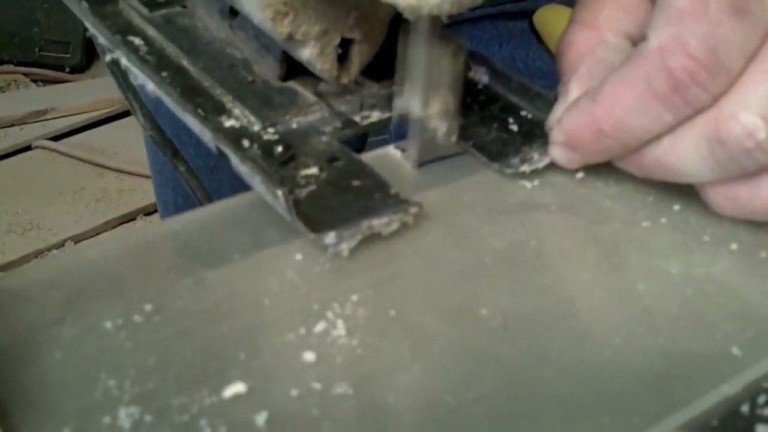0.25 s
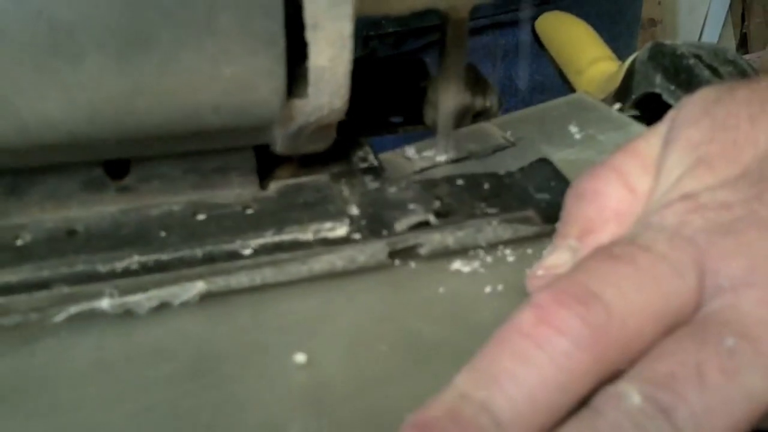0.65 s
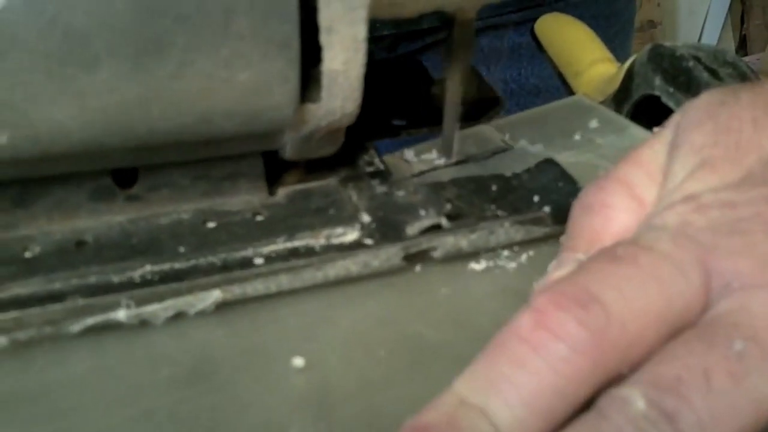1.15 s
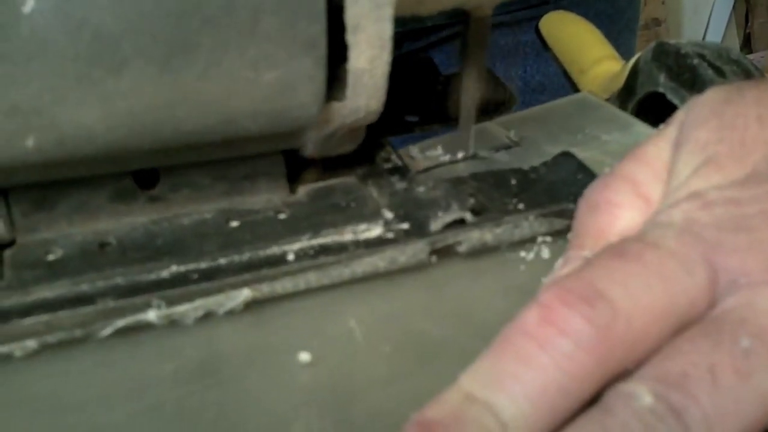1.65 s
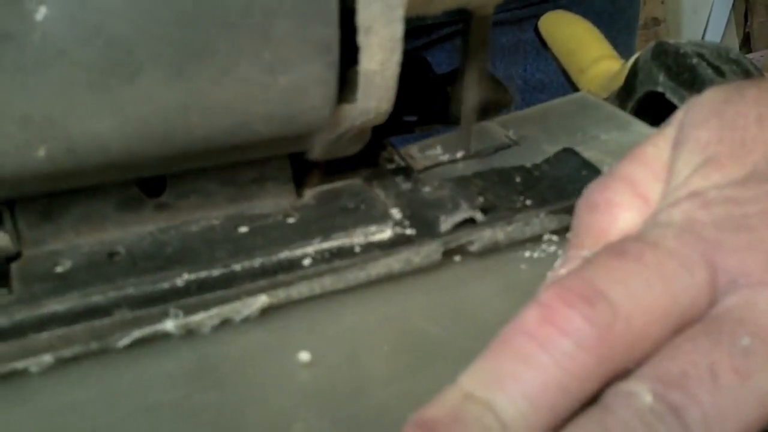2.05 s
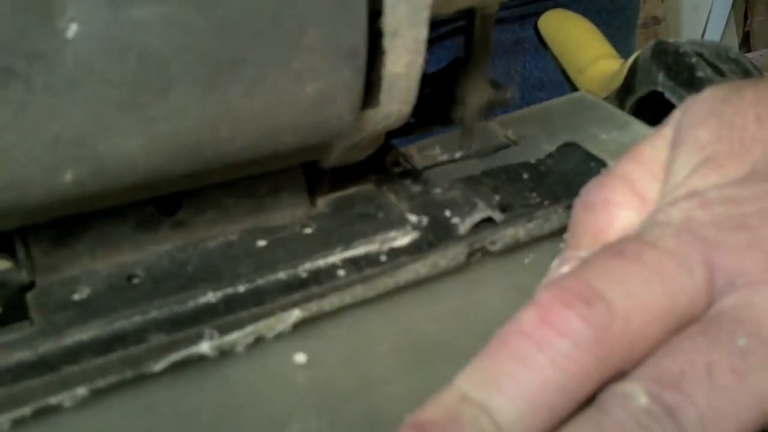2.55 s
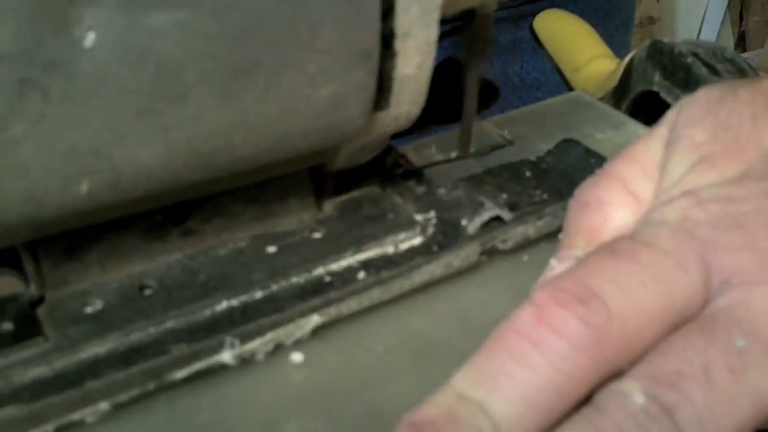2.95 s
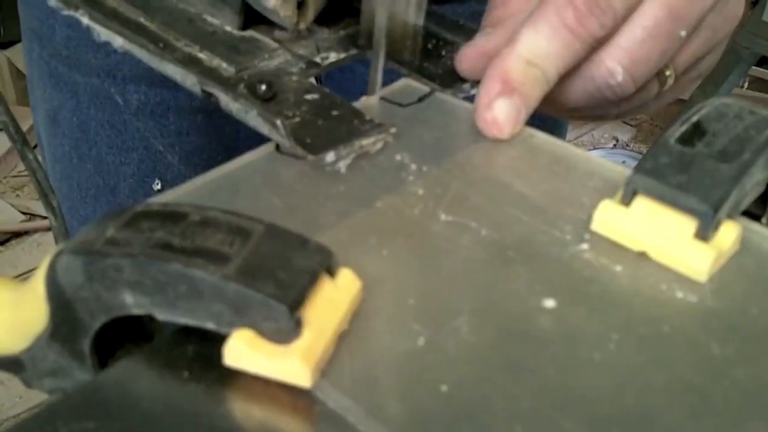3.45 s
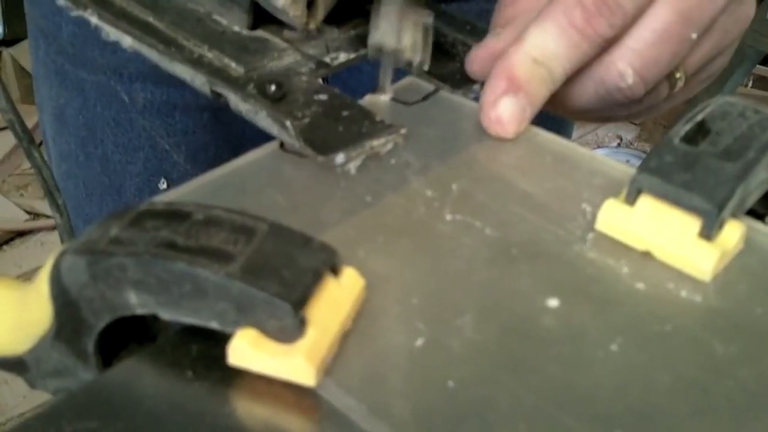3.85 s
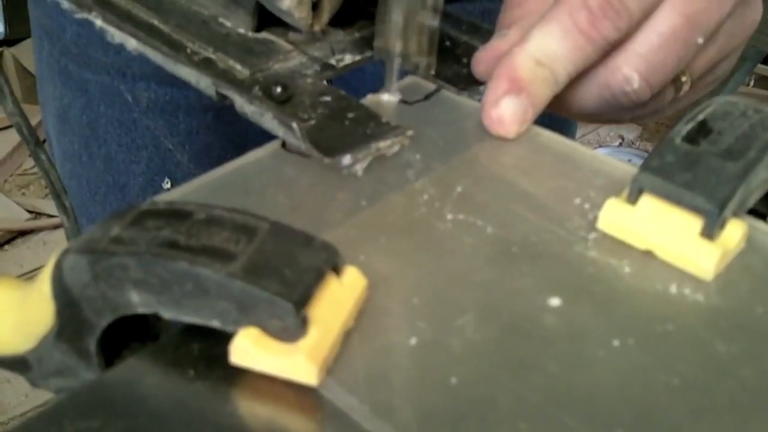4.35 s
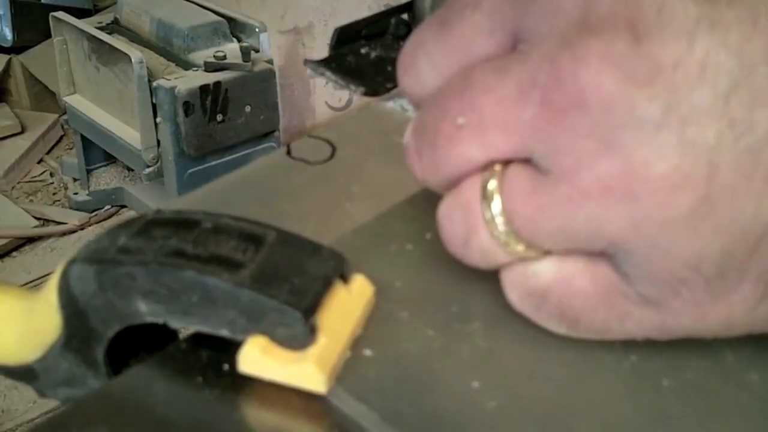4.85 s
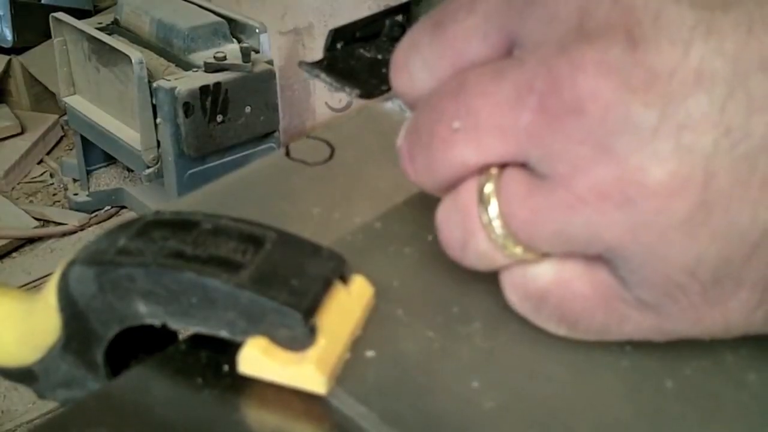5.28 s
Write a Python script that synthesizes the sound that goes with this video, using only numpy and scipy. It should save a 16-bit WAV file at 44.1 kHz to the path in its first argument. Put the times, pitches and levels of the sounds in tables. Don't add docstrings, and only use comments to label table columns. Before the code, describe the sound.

Close, harsh rattling of an electric jigsaw cutting plastic, changing speed from take to take, with gear whine, snags and one dull bump.

```python
import sys
import numpy as np
from scipy import signal
from scipy.fft import irfft
from scipy.io import wavfile
from scipy.ndimage import uniform_filter1d

SR = 44100
rng = np.random.default_rng(int(sys.argv[2]) if len(sys.argv) > 2 else 0)


def makeup_ratio(level_db):
    decades = np.asarray(level_db, float) / 20
    return 10 ** decades


def generate_wav(signal):
    frames = np.transpose(np.atleast_2d(signal))
    scaled = np.clip(frames, -1, 1) * 32767
    pcm = np.round(scaled).astype(np.int16)
    wavfile.write(sys.argv[1], SR, pcm)


N = 243431

# start_s, end_s, fade_in_s, fade_out_s
TAKES = [
    (0, .499, .0001, 0.093),
    (.499, 3.368, 0.1, .075),
    (3.368, 4.736, 0.17, 0.086),
    (4.736, 5.6, 0.12, .01),
]
BITES = [(.3, .05, .75, .05, .2, .3), (.98, .035, .66, .06, .57, .8), (.4, .04, .05, .08, .4, .3),
         (.96, .06, .33, .05, .0, .3)]
GEAR = 70.0


def evened(x):
    return x / np.sqrt(np.mean(x ** 2) + 1e-20)


def read(points, hz):
    f, value = np.transpose(points)
    return np.interp(np.log(hz + 1), np.log(f + 1), value)


def colour(x, db_of):
    log_gain = np.log(makeup_ratio(db_of(abs(np.fft.fftfreq(8192, 1 / SR)))))
    response = np.exp(np.conj(signal.hilbert(log_gain)))[:4097]
    return signal.oaconvolve(x, irfft(response)[:4096])[:len(x)]


def wander(size, hz):
    span = max(int(SR / hz), 2)
    return evened(uniform_filter1d(uniform_filter1d(rng.standard_normal(size), span), span))


def crest(turns, at, width):
    return np.exp((np.cos(2 * np.pi * (turns - at)) - 1) / (2 * np.pi * width) ** 2)


def chips(size, per_s, spread_db):
    clicks = (rng.random(size) < per_s / SR) * rng.standard_normal(size)
    clicks = clicks * makeup_ratio(spread_db * np.minimum(rng.exponential(1, size), 4))
    return evened(evened(clicks) + 1.14 * rng.standard_normal(size))


def blade_motion(k, t):
    # time_s, blade_strokes_per_s
    stroke_rates = [
        [(0, 37.3), (.27, 29), (.49, 26)],
        [(.51, 29.515), (.71, 28.193), (1.14, 32.147), (1.54, 28.456), (1.88, 32.444), (2.23, 34.222),
         (2.6, 33.123), (3.23, 33.77), (3.36, 33.443)],
        [(3.39, 38.276), (3.55, 36.761), (3.93, 34.897), (4.54, 36.099), (4.73, 35.002)],
        [(4.75, 27.182), (5.14, 27.149), (5.52, 26.033)],
    ]
    s, rate = np.transpose(stroke_rates[k])
    inertia_s = 0.155
    rate = uniform_filter1d(np.interp(t, s, rate), size=round(inertia_s * SR), mode="nearest")
    turns = np.cumsum(rate) / SR
    return rate, turns - np.interp(s[0], t, turns)


def hand_feed(t):
    # time_s, rasp_db, chatter_db
    feed_curve = [(0, -25, 0), (.32, -24.5, -3), (.45, -24, 3), (.6, -27.5, 6.5), (.83, -26, -1),
                  (1.05, -26.5, 4.5), (1.2, -24.5, 3.5), (1.68, -26.5, -1), (1.98, -25.5, 4.5),
                  (2.6, -25, 0), (3.45, -25.5, 1.5), (3.72, -29.5, -1.5), (4.08, -27, 1), (4.6, -25.8, -1),
                  (4.82, -31.5, -0.5), (5.06, -32.5, 1), (5.2, -25.5, -0.5), (5.52, -30, -2)]
    s, rasp_db, chatter_db = np.transpose(feed_curve)
    return np.interp(t, s, rasp_db), np.interp(t, s, chatter_db)


def cutting(k, t, turns, rasp_db, chatter_db, caught):
    # mode_hz, width_hz, lift_db
    ring_modes = [
        [(1430, 190, 7), (2230, 180, -1.5), (3430, 240, 6), (4600, 1700, 4.5), (6530, 560, 5.5)],
        [(200, 53, -3.5), (1005, 26, 7.5), (1202, 21, 6), (1462, 52, 9), (2044, 86, 10.5), (2210, 120, 4.5),
         (3264, 160, 6), (4140, 370, 6), (4630, 220, 5), (6160, 780, 3.5), (7080, 134, 14.5)],
        [(200, 130, -2.5), (489, 69, 6), (676, 104, 8.5), (1520, 510, 6.5), (3330, 220, 6.5), (3870, 220, 4),
         (4550, 900, 4.5), (6530, 910, 4.5)],
        [(475, 61, 12), (730, 24, 11), (1253, 174, 12.5), (2390, 430, 9), (3470, 290, 5), (4600, 170, 5),
         (6550, 210, 6)],
    ]
    # freq_hz, level_db
    rasp_colour = [(30, -34), (100, -13), (250, -17), (600, -8.5), (1200, -8.5), (2000, -6), (3000, 1),
                   (5000, 1), (8000, 0), (15000, 2.5)]
    # freq_hz, level_db
    bite_colour = [(100, -17), (300, -13.5), (800, -16.5), (1300, -12.5), (2200, -5), (3500, -2),
                   (5000, -1), (8000, 0), (15000, 0.5)]
    # low_lift_db, fizz_lift_db, fizz_drift_db_per_s, first_bite_db, second_bite_db
    camera_views = [(0, 2, -4.5, -5, -1), (1.88, 0.5, -0.9, -1, 0.5), (0.84, 6, -4, -0.5, 5.5),
                    (-0.5, 1.5, -2, 10.5, 9)]
    low_db, fizz_db, drift_db, first_db, second_db = camera_views[k]
    first, first_width, second, second_width, _, _ = BITES[k]
    size = len(t)

    def rings(hz):
        lift = sum((makeup_ratio(db) - 1) / (1 + (2 * (hz - f) / w) ** 2) for f, w, db in ring_modes[k])
        return 20 * np.log10(1 + lift)

    rasp = chips(size, 4000, 2.5) * makeup_ratio(rasp_db + 1.2 * wander(size, 250) - 2.1)
    luck = makeup_ratio(1.3 * wander(size, 80))
    bite = makeup_ratio(first_db + chatter_db) * crest(turns, first, first_width)
    bite = bite + makeup_ratio(second_db + chatter_db) * crest(turns, second, second_width)
    bites = chips(size, 4000, 1.8) * bite * luck * makeup_ratio(rasp_db - 2.5) + caught
    cut = colour(rasp, lambda hz: read(rasp_colour, hz) + rings(hz) + 6.44)
    cut = cut + colour(bites, lambda hz: read(bite_colour, hz) + rings(hz) + 6.56)

    low = signal.sosfiltfilt(signal.butter(4, 2700, fs=SR, output="sos"), cut)
    fizz = signal.sosfiltfilt(signal.butter(6, 5500, "high", fs=SR, output="sos"), cut)
    low_db = low_db - 0.15 * (rasp_db - rasp_db.mean())
    fizz_db = fizz_db + drift_db * (t - t[0])
    return cut + (makeup_ratio(low_db) - 1) * low + (makeup_ratio(fizz_db) - 1) * fizz


def snags():
    # time_s, peak_db, ring_ms
    single_snags = [(0.061, -7.5, 1.6), (0.1496, -7.5, 1.5), (0.3017, -9, 2), (0.7008, -5.5, 1.1),
                    (1.3934, 0.5, 1.6), (1.4244, -6.5, 1.4), (1.4925, -5.5, 1.1), (1.7956, -3.5, 1.5),
                    (1.8078, -5.5, 1.1), (2.3302, -14, 2.2), (2.4168, -11, 1.5), (3.4141, -4, 1.6),
                    (3.6030, -6.5, 2.3), (3.693, -8, 1.5), (4.0056, -5, 1.2), (4.1107, -3, 0.58),
                    (4.587, -13, 1.4), (4.6246, -5, 1.26), (4.759, -3, 1.4), (4.8343, -5, 1.3),
                    (4.9265, -4, 3.1), (5.11, -6.5, 2.4), (5.202, -10, 0.84), (5.3745, -3, 1.44)]
    # first_s, last_s, rough_gap_s, first_db, last_db
    snag_runs = [(0.362, .38, .018, -8, -10), (0.595, .63, .018, -7, -10), (.7844, .8194, .035, -10, -9.5),
                 (1.647, 1.6786, .034, -13, -9), (3.7218, 3.832, .028, -4, -3.5),
                 (3.861, 3.9205, .029, -6.5, -28), (4.28, 4.336, .028, -9, -14),
                 (4.7444, 4.8217, .037, 3, -6), (4.9677, 5.0772, .037, -7.5, -14),
                 (5.1474, 5.3374, .037, -13, -8.5), (5.161, 5.3144, .038, -8.5, -13),
                 (5.4124, 5.4899, .037, -4, -6)]
    snag_shapes = [(1.54, 2), (1.54, 2), (.7, .7), (2.6, 3.5)]
    ring_share, luck_db = 0.051, 0.84
    rows = list(single_snags)
    for first, last, gap, first_db, last_db in snag_runs:
        for share in np.linspace(0, 1, num=round((last - first) / gap) + 1):
            db = first_db + share * (last_db - first_db) + luck_db * rng.standard_normal()
            rows.append((first + share * (last - first), db, 1000 * ring_share * gap))

    lead = 300
    out = np.zeros(N + 1500)
    t = np.arange(-lead, 900)
    for s, db, ms in rows:
        rise, roundness = snag_shapes[sum(s > end for _, end, *_ in TAKES)]
        grain = rng.standard_normal(len(t))
        grain = grain / np.sqrt(uniform_filter1d(grain ** 2, size=30))
        u = np.maximum(1 + (1000 * t / SR / ms - 1.4) / rise, 0)
        swell = (u * np.exp(1 - u)) ** roundness
        out[round(s * SR):][:len(t)] += makeup_ratio(db - 11.9) * grain * swell
    return out[lead:N + lead]


def knock(turns, at, hz, t60):
    size = len(turns)
    slap = np.diff(np.floor(turns - at), prepend=np.floor(turns[0] - at))
    slap = slap * makeup_ratio(1.8 * wander(size, 40))
    rattle = signal.oaconvolve(slap, np.hanning(120))[:size] * rng.standard_normal(size)
    slap = slap + 0.07 * rattle
    spin = np.exp(2j * np.pi * np.cumsum(hz * (1 + 0.025 * wander(size, 30))) / SR)
    decay = 1000 ** (-1 / (t60 * SR))
    ring = (spin * signal.lfilter([1], [1, -decay], slap / spin)).imag
    return evened(np.diff(uniform_filter1d(ring, size=9), prepend=0))


def slaps(k, t, turns):
    # first_slap_db, first_hz_at_start, first_hz_settled, second_slap_db
    slap_levels = [(-47.5, 1380, 2000, -45.5), (-46, 1250, 958, -49.5), (-49, 1500, 1400, -53),
                   (-47, 1250, 1230, -43.5)]
    # second_slap_hz, first_t60_s, second_t60_s
    slap_rings = [(2260, 0.039, 0.016), (1492, 0.023, 0.033), (1817, 0.03, 0.048), (2340, 0.034, 0.012)]
    # middle_s, half_length_s, first_lift_db, second_lift_db
    flap_spells = [(.8, .17, 8, 0.5), (0.932, 0.12, -0.5, 16), (1.18, 0.14, 4, 8.5),
                   (1.524, 0.32, 7.5, 10.5), (1.89, 0.053, 2.5, -1), (2.952, 0.04, 5.5, 1),
                   (3.443, 0.083, 10.5, 11), (3.79, .07, 0, 11), (4.34, .07, -3, -3), (4.66, .1, -14, 4),
                   (4.84, 0.086, -2, 8), (4.98, .1, 1.5, -3), (5.27, 0.1, 6, 14)]
    first_db, loose_hz, settled_hz, second_db = slap_levels[k]
    second_hz, first_t60, second_t60 = slap_rings[k]
    first, second = BITES[k][0], BITES[k][2]
    looseness = np.clip(1 - ((t - t[0]) / 1.04) ** 2, 0, 1)
    first_hz = settled_hz + (loose_hz - settled_hz) * looseness
    for middle, half, first_lift_db, second_lift_db in flap_spells:
        spell = np.exp(-((t - middle) / half) ** 2)
        first_db = first_db + first_lift_db * spell
        second_db = second_db + second_lift_db * spell

    tick_lead = 0.06
    body = knock(turns, first - 0.6 * tick_lead, first_hz, first_t60)
    tick = knock(turns, first - tick_lead, 0.89 * first_hz, 0.003)
    return makeup_ratio(first_db) * (body + tick) + makeup_ratio(second_db) * knock(turns, second, second_hz, second_t60)


def gear_whine(k, t, rate, turns):
    # level_db, drift_db_per_s, mode_hz, width_hz, lift_db
    whine_modes = [(-47.5, -2, 2230, 260, 17.5), (-35.5, -0.6, 2046, 370, 8), (-45, 6.5, 2610, 91, 11),
                   (-51, 4, 1900, 200, 5)]
    base_db, creep_db, mode_hz, width_hz, lift_db = whine_modes[k]
    size = len(t)
    whine_db = base_db + creep_db * (t - t[0])
    whine_db = whine_db + lift_db / (1 + (2 * (GEAR * rate - mode_hz) / width_hz) ** 2)
    gear_at, throb = BITES[k][4:]
    load = crest(turns, gear_at, 0.12) + 0.6 * crest(turns, gear_at + 0.43, 0.06)
    mesh = 1 - throb + throb * 1.8 * load
    lag = 0.5 * np.sin(4 * np.pi * turns + 1.27) + 0.32 * wander(size, 104)
    return np.sin(2 * np.pi * GEAR * turns + lag) * mesh * makeup_ratio(whine_db + 1.5 + 0.4 * wander(size, 87))


def bench_shake(k, t, turns, rasp_db):
    shake_orders = [1, 2, 3, 4, 5, 6, 7, 7.78, 9, 12, 14, 16, 19]
    order_levels = [
        [-80, -54, -52, -72, -59, -70, -74, -59, -73, -69, -56, -66, -56],
        [-60, -62, -47, -53, -55, -66, -58, -53, -56, -60, -67, -58.5, -65],
        [-47, -53.5, -55, -60, -70, -83, -75, -60, -59.5, -55.5, -47, -53.5, -55],
        [-63, -60, -55, -63, -55.5, -60, -67, -76, -70, -58, -65, -54, -50.5],
    ]
    bench_hum = (30, -47)
    mode_swell = (0.21, 0.075, 14)
    shake = {}
    for m, db in zip(shake_orders, order_levels[k]):
        drift = makeup_ratio(db + 2 + 1.5 * wander(len(t), 5.3))
        shake[m] = drift * np.sin(2 * np.pi * (m * turns + rng.random()))
    if k == 0:
        middle, spread, lift_db = mode_swell
        shake[3] = shake[3] * makeup_ratio(lift_db * np.exp(-((t - middle) / spread) ** 2))
        hum_hz, hum_db = bench_hum
        shake[1] = makeup_ratio(hum_db + 3) * np.sin(2 * np.pi * hum_hz * t)
    return makeup_ratio(0.8 * (rasp_db - rasp_db.mean())) * sum(shake.values())


def take(k, caught):
    start, end, rise, fall = TAKES[k]
    t = np.arange(round(start * SR), min(round(end * SR), N)) / SR
    rate, turns = blade_motion(k, t)
    rasp_db, chatter_db = hand_feed(t)
    caught = caught[round(start * SR):][:len(t)]
    saw = cutting(k, t, turns, rasp_db, chatter_db, caught)
    saw = saw + slaps(k, t, turns)
    saw = saw + gear_whine(k, t, rate, turns)
    saw = saw + bench_shake(k, t, turns, rasp_db)
    fade = np.clip((t - start) / rise, 0, 1) * np.clip((end - t) / fall, 0, 1)
    return saw * fade ** 1.055


def bump():
    # time_s, level_db, rise_s, fall_s
    camera_push = (1.3938, -6.5, .0016, .0105)
    # freq_hz, level_db, t60_s
    shell_ring = (680, -22, 0.022)
    s, db, rise, fall = camera_push
    hz, ring_db, t60 = shell_ring
    t = np.maximum(np.arange(N) / SR - s, 0)
    shell = makeup_ratio(ring_db - 60 * t / t60) * np.sin(2 * np.pi * hz * t)
    sag = 1.32 * np.exp(-t / fall) - 0.47 * np.exp(-t / 0.028)
    return shell + makeup_ratio(db) * (1 - np.exp(-t / rise)) * sag


def scene():
    caught = snags()
    saw = np.concatenate([take(k, caught) for k in range(len(TAKES))]) + bump()
    return np.array([saw, saw])


def low_pass(x):
    return signal.sosfilt(signal.butter(12, 15680, fs=SR, output="sos"), x)


def record(dry):
    # freq_hz, level_db
    band_shelves = [(20, 1.5), (4950, 0.5), (5100, -10), (5750, -10), (7200, -17.5), (7500, -14),
                    (8300, -22), (9000, -22), (10300, -22.5), (11300, -25), (13600, -29), (14500, -34.5),
                    (15300, -47), (15900, -77)]
    # freq_hz, width_hz, depth_db
    band_gaps = [(2709, 136, 24.3), (5500, 126, 25.4), (7827, 220, 49), (10840, 154, 33)]
    # freq_hz, level_db
    side_levels = [(100, -75), (1000, -39.5), (1400, -42), (2000, -22), (2800, -15.5), (3500, -12.5),
                   (5000, -9), (6500, -6.5), (9000, -2.5), (12000, -0.5), (15000, 5)]
    ceiling, mute_db = 0.85, -53

    def bands(hz):
        gaps = sum(db * np.exp(-abs((hz - f) / w) ** 0.92) for f, w, db in band_gaps)
        return read(band_shelves, hz) - gaps

    limited = ceiling * np.tanh(colour(dry[0], bands) / ceiling)
    hz, _, z = signal.stft(limited, SR, nperseg=512)
    power = abs(z) ** 2
    total = power.sum(0)
    running = np.minimum(uniform_filter1d(total, size=60), 3 * total)
    threshold = running * makeup_ratio(mute_db + 2 * rng.standard_normal(z.shape[1])) ** 2
    heard = uniform_filter1d(power, size=4, axis=0) > threshold
    z = z * np.where(heard | (hz < 5000)[:, None], 1, 0.03)

    scatter = np.exp(2j * np.pi * rng.random(z.shape))
    side = z * (0.95 * scatter - 0.7j) * makeup_ratio(read(side_levels, hz))[:, None]
    mid, side = (signal.istft(part, SR, nperseg=512)[1][:N] for part in (z, side))
    return low_pass(np.array([mid + side, mid - side]))


dry = scene()
out = record(dry)
generate_wav(out)
```